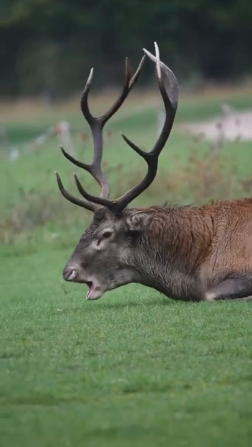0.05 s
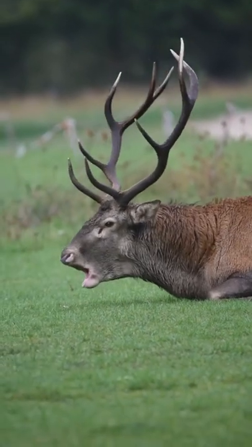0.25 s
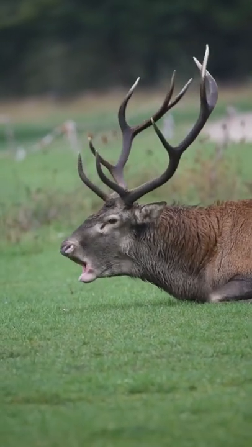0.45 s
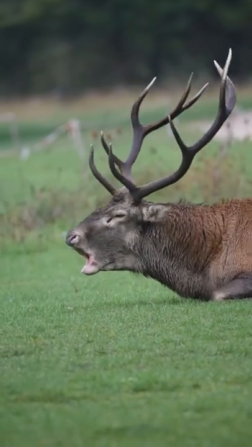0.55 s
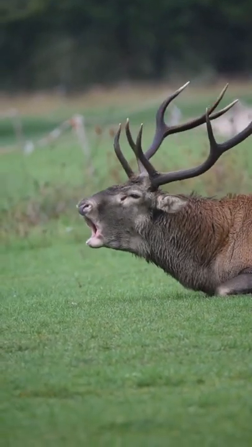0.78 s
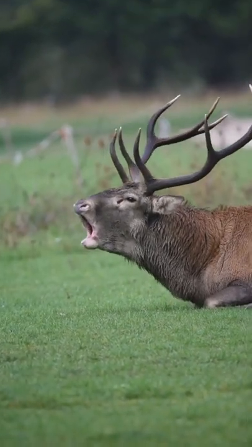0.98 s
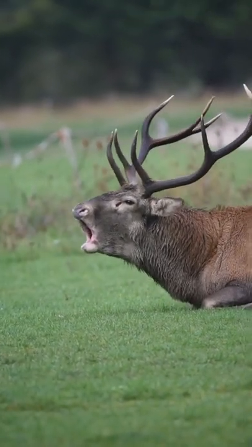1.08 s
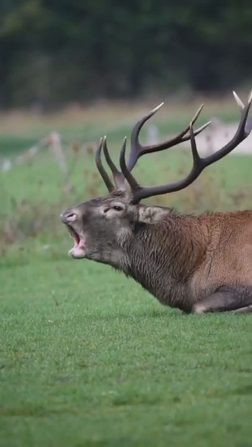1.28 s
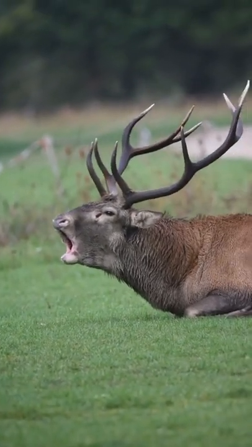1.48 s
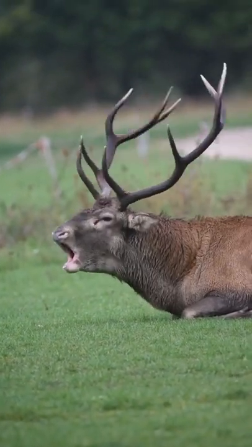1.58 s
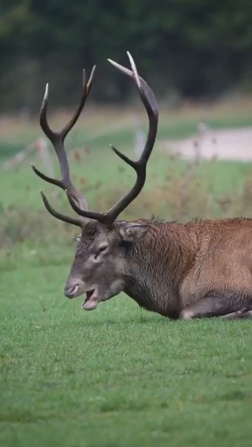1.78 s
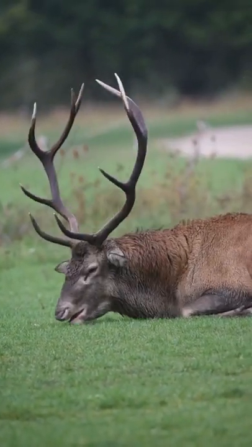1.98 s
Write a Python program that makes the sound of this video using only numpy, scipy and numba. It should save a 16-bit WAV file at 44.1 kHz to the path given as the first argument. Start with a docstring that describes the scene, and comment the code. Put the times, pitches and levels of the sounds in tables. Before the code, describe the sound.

A red deer stag gives one long, harsh roar. It starts softly and roughly, rising in pitch until about 0.3 seconds, then grows louder and sinks to a lower, rasping held tone from 0.8 seconds. Around 1.7 seconds it drops into a creaky grunt and stops by 1.9 seconds. A faint, dull echo fades over the quiet rumble and hiss of the open meadow.

```python
"""One long, harsh roar of a red deer stag carries across a meadow. By the source-filter principle,
pulses of his vocal folds and rasping air excite the resonances of his throat, which sink as he
stretches his neck. The roar ends in a slow, creaky grunt as the mouth closes.
A faint echo returns from the forest edge over a quiet outdoor background."""
import sys
import numpy as np
from scipy import signal
from scipy.fft import rfft, irfft
from scipy.io import wavfile
from scipy.ndimage import uniform_filter1d, map_coordinates
from numba import njit

SR = 44100
rng = np.random.default_rng(int(sys.argv[2]) if len(sys.argv) > 2 else 0)


def unload_audio(sound):
    """Save the sound as a 16-bit wav file, at the path given as the first command line argument."""
    columns = np.transpose(np.atleast_2d(sound))
    # keep every value between -1 and 1, then stretch to whole-number steps
    steps = np.round(np.clip(columns, -1, 1) * 32767)
    wavfile.write(sys.argv[1], SR, steps.astype(np.int16))


N = 90404
TIME_S, BIN_HZ = np.arange(N) / SR, np.arange(N // 2 + 1) * SR / N
LEFT_RIGHT = np.array([[1], [-1]])

# Vibration of the vocal folds. Each row: time in seconds, pulse rate in Hz.
PITCH = [(.06, 117.7), (.1, 123.1), (.13, 137.7), (.2, 150.9), (.262, 152.1), (.39, 147.2), (.526, 141.3),
         (.606, 136.1), (.676, 126.4), (.724, 118.2), (.776, 114.2), (.82, 112.3), (.996, 111.2),
         (1.046, 110.6), (1.146, 108.5), (1.3, 110), (1.432, 112.7), (1.538, 119.9), (1.58, 121),
         (1.644, 119.2), (1.69, 113.3), (1.712, 91.36), (1.75, 73.67)]
# Irregularity and breathiness of the voice. Each row: time in seconds, roughness from 0 to 1.
ROUGHNESS = [(.05, 1), (.14, 0.18), (.24, 0.06), (.56, 0.06), (.68, 0.24), (.8, 0.17), (1.1, 0.05),
             (1.4, 0.07), (1.62, 0.06), (1.7, 0.43), (1.78, 1)]

# Formants, the throat's resonances, in six groups from low to high.
# Each row: time in seconds, then the centre of each formant of the group in Hz.
LOW_HZ = [(0.1, 288, 507, 898, 960), (0.19, 310, 570, 786, 884), (0.28, 373, 503, 796, 934),
          (0.45, 365.7, 485, 750, 840), (0.599, 386, 449, 761, 870), (0.679, 285, 504.8, 632, 850),
          (0.8, 222, 480, 590.5, 847), (1.0, 265.6, 444, 554, 890), (1.13, 260, 416, 529, 840),
          (1.35, 275, 430, 554, 820), (1.44, 258, 544, 543, 850), (1.56, 294, 420, 518, 710),
          (1.68, 267, 504, 578.4, 890)]
MID_HZ = [(0.1, 955, 1385, 1270), (0.19, 938, 1306, 1360), (0.28, 886, 1215, 1300), (0.45, 830, 1146, 1174),
          (0.6, 850, 1125, 1204), (0.68, 660.3, 1063, 1420), (0.8, 626, 1040, 1340), (1.0, 645, 1017, 1324),
          (1.128, 640, 1050, 1314), (1.351, 746, 1033, 1260), (1.441, 890, 1019, 1274),
          (1.58, 945, 1060, 1260), (1.68, 920, 1050, 1280)]
NASAL_HZ = [(.1, 1810, 2030), (.25, 1734, 1970), (.36, 1710, 2140), (.5, 1712, 1920), (.62, 1690, 1875),
            (.72, 1610, 1890), (.85, 1740, 1974), (1.0, 1803, 1955), (1.2, 1731, 1850), (1.352, 1780, 1890),
            (1.44, 1660, 1800), (1.58, 1816, 1880), (1.7, 1830, 1850)]
UPPER_HZ = [(.12, 2180, 2260, 2900, 3360), (.26, 2210, 2680, 2950, 3300), (.4, 2530, 2540, 2820, 3370),
            (.6, 2140, 2533, 2900, 3200), (.7, 2220, 2646, 3000, 3320), (.85, 2340, 2607, 2920, 3400),
            (1.02, 2460, 2734, 3010, 3130), (1.13, 2222, 2600, 3133, 3623), (1.33, 2205, 2597, 3090, 3370),
            (1.44, 2212, 2552, 3060, 3210), (1.58, 2215, 2508, 2700, 3150), (1.7, 2150, 2590, 3120, 3280)]
TREBLE_HZ = [(.26, 4100, 4940, 5550), (.4, 3490, 4570, 5480), (.55, 3380, 4660, 5430),
             (.7, 3540, 4150, 5400), (.85, 4150, 5260, 5540), (1.02, 3900, 5040, 5530),
             (1.2, 3560, 4480, 5530), (1.33, 3670, 4570, 5400), (1.45, 3500, 4200, 5500),
             (1.6, 3570, 4200, 5582), (1.718, 3500, 5160, 5450)]
SIZZLE_HZ = [(.3, 6240, 6870, 7300), (.6, 5900, 7340, 8200), (.9, 5900, 7600, 7950),
             (1.2, 6060, 7400, 8138), (1.451, 6060, 7750, 8140), (1.7, 6240, 7830, 8100)]
# How each of those formants rings. Each row: bandwidth in Hz, relative gain in dB, polarity.
LOW_MODES = [(124, -5.5, 1), (65.4, -3, -1), (23.9, 10.5, -1), (48.3, -8, 1)]
MID_MODES = [(73.6, 7.5, 1), (42.7, 9.5, -1), (71.3, 1, 1)]
NASAL_MODES = [(82.6, -0.077, 1), (80, -0.92, -1)]
UPPER_MODES = [(129, -3, 1), (88, 4, -1), (129, -6, 1), (158, -6.5, -1)]
TREBLE_MODES = [(320, 3, 1), (420, 1, -1), (298, 2.5, 1)]
SIZZLE_MODES = [(450, 0.31, 1), (500, 0, -1), (525, 0.5, 1)]
# Envelopes of the groups, ahead of the notch and final fade. Each row: time in seconds, level in dB.
LOW_LEVEL = [(0.042, -62), (0.076, -41.5), (0.104, -40.5), (.148, -46), (0.255, -32.5), (.328, -26),
             (0.414, -21.5), (0.636, -21.5), (0.691, -29.5), (.834, -28.5), (0.995, -21), (1.12, -18),
             (1.231, -20.5), (1.37, -19), (1.416, -31.5), (1.451, -24.5), (1.484, -29), (1.664, -28.5),
             (1.696, -20.5), (1.744, -27), (1.774, -38), (1.809, -79), (1.86, -91)]
MID_LEVEL = [(0.049, -66), (0.149, -37.5), (.252, -39), (0.327, -30), (.585, -28.5), (0.639, -47.5),
             (0.679, -33), (.834, -35.5), (0.988, -30.5), (1.054, -48), (1.125, -35.5), (1.351, -41.5),
             (1.411, -30), (1.484, -31.5), (1.55, -39), (1.71, -33), (1.749, -39.5), (1.791, -53),
             (1.86, -97)]
NASAL_LEVEL = [(0.05, -84), (0.07, -59), (0.13, -43.5), (0.21, -40.5), (0.452, -45), (0.568, -41.5),
               (0.634, -45), (0.67, -39.5), (0.88, -41.5), (0.962, -38), (1.092, -44), (1.35, -43),
               (1.374, -53), (1.436, -49), (1.512, -44.5), (1.712, -42.5), (1.808, -60.5), (1.86, -58)]
UPPER_LEVEL = [(0.05, -80), (0.12, -54.5), (0.312, -45.5), (0.644, -41), (0.68, -38), (0.776, -43),
               (0.8, -38.5), (1.012, -35.5), (1.062, -40.5), (1.112, -33.5), (1.31, -34), (1.37, -40.5),
               (1.622, -33.5), (1.642, -39.5), (1.698, -36), (1.758, -41), (1.784, -56), (1.86, -64)]
TREBLE_LEVEL = [(.12, -74), (.33, -56), (.46, -53), (.62, -58.5), (.676, -51), (.71, -55.5), (.8, -51.5),
                (1.04, -43), (1.068, -53.5), (1.118, -43), (1.162, -45.5), (1.33, -46), (1.472, -53.5),
                (1.66, -51.5), (1.7, -43), (1.725, -52), (1.746, -44), (1.79, -57), (1.86, -75)]
SIZZLE_LEVEL = [(0.2, -70), (0.286, -64.5), (0.634, -58), (0.856, -44), (1.24, -50.5), (1.262, -47),
                (1.55, -51.5), (1.678, -45.5), (1.716, -51.5), (1.744, -43), (1.818, -65), (1.86, -72)]
# Deepest resonance, strongest with the mouth nearly shut. Each row: time in seconds, level in dB.
GRUNT_LEVEL = [(.04, -61), (.075, -53), (.14, -87), (0.298, -46), (1.66, -48), (1.7, -36), (1.735, -27),
               (1.76, -36.5), (1.802, -47.5), (1.88, -80)]
# Damping of the low formants. Each row: time in seconds, multiple of their bandwidth.
LOW_DAMPING = [(.1, 1.2), (.3, 1), (1.4, 1), (1.55, 1.2), (1.68, 1.2), (1.74, 2.2)]
# Antiresonance that hollows the held vowel. Each row: time in seconds, depth from 0 to 1.
NOTCH_DEPTH = [(.74, 0.026), (.85, 0.82), (1.38, 0.82), (1.5, 0.2)]

# Envelope of the air rushing through the mouth. Each row: time in seconds, level in dB.
HISS_LEVEL = [(.2, -77), (.36, -61.5), (.55, -65), (.66, -60), (.76, -59), (1.0, -63.5), (1.6, -68.5),
              (1.74, -60), (1.8, -67)]
# Colour of that air. Each row: frequency in Hz, relative spectral density in dB.
HISS_SPECTRUM = [(7000, -28), (9000, -4), (11000, -4.5), (13200, -11.5), (14500, -23.5)]
# Near reflections from the ground and the animal's body. Each row: delay in seconds, gain in dB.
REFLECTIONS = [(.0019, -10), (.0038, -8.5)]
# Stereo balance of the direct sound. Each row: frequency in Hz, left minus right level in dB.
BALANCE = [(300, 0), (550, .7), (1200, .4), (2400, -2.3), (4400, -1), (8000, -2.2), (13000, -.8)]
# Colour of the outdoor background. Each row: frequency in Hz, relative spectral density in dB.
BACKGROUND_SPECTRUM = [(25, -13), (60, 0), (130, 0), (250, -6.5), (500, -10), (1000, -11.5), (2500, -20),
                       (4000, -29.5), (9000, -30), (13000, -40.5), (15500, -59)]

PUFF_CYCLES, LEAK = 0.26, 0.58  # decay of each puff of air, and the steady flow beneath it


def stag():
    """Source and filter: pulses drive the low formants; buzz and rasp take over towards the treble."""
    pulses, air, stereo_air = vocal_folds()
    buzz = fold_buzz()
    smooth_source = pulses + undb(-12.5) * air
    mouth_closing = 1 - 0.43 * curve([(1.698, 0), (1.725, 1)])  # lowers the low formants
    low = throat(smooth_source, LOW_HZ, LOW_MODES, LOW_LEVEL, band_hz=(110, 756),
                 shift=mouth_closing, damping=curve(LOW_DAMPING))
    grunt = throat(smooth_source, centres=[(0, 181.7)], modes=[(20, 0, 1)], levels=GRUNT_LEVEL,
                   band_hz=(85, 250))
    mid = throat(-pulses + undb(2.5) * air, MID_HZ, MID_MODES, MID_LEVEL, band_hz=(781, 1438))
    vowel = low + mid
    vowel -= curve(NOTCH_DEPTH) * resonate(vowel, hz=np.full(N, 658.), width_hz=np.full(N, 63.))

    breathy_source = pulses + undb(5) * air
    nasal_source = near_reflections(breathy_source + undb(-5) * buzz)
    nasal = throat(nasal_source, NASAL_HZ, NASAL_MODES, NASAL_LEVEL, band_hz=(1400, 2200))
    upper_source = near_reflections(breathy_source + undb(-7) * buzz)
    upper = throat(upper_source, UPPER_HZ, UPPER_MODES, UPPER_LEVEL, band_hz=(2050, 3800))

    treble = np.zeros((2, N))
    for channel, own_air in enumerate(stereo_air):
        rasp = near_reflections(pulses + undb(4) * buzz + undb(15) * (air + own_air))
        treble[channel] = throat(rasp, TREBLE_HZ, TREBLE_MODES, TREBLE_LEVEL, band_hz=(3000, 6200))
        treble[channel] += throat(rasp, SIZZLE_HZ, SIZZLE_MODES, SIZZLE_LEVEL, band_hz=(5500, 9600))
    fade = curve([(1.79, 1), (1.854, 0)])
    return (vowel + grunt + nasal + upper + treble + mouth_hiss()) * fade


def vocal_folds(jitter_s=0.00005, shimmer_db=5):
    """Glottal source: each closure makes a pulse and a puff; roughness scales scatter and turbulence."""
    roughness, cycles = curve(ROUGHNESS), fold_cycles()
    turbulence = rng.standard_normal((3, N))
    closures_s = np.interp(np.arange(1, int(cycles[-1])), cycles, TIME_S)
    scatter = rng.standard_normal((len(closures_s), 2)).T * np.interp(closures_s, TIME_S, roughness)
    position = (closures_s + jitter_s * scatter[0])[:, None] * SR
    strength = undb(shimmer_db * scatter[1])[:, None]
    taps = position.astype(int) + np.arange(-7, 9)
    impulse = np.sinc(taps - position) * np.sinc((taps - position) / 8)  # band-limited
    pulses = np.zeros(N)
    np.add.at(pulses, np.clip(taps, 0, N - 1), -impulse * strength)
    airflow = LEAK + puff(cycles) + 0.3 * puff(cycles - 0.3)  # a weaker puff as the folds part
    shared_air = roughness * unit_rms(airflow * turbulence[0])
    stereo_air = roughness * unit_rms(airflow * turbulence[1:])
    return unit_rms(pulses), shared_air, stereo_air


def fold_cycles():
    """Phase is the integral of frequency: the running count of the folds' cycles."""
    return np.cumsum(curve(PITCH)) / SR


def puff(cycles):
    """Airflow jumps once a cycle and relaxes exponentially."""
    return np.exp(-(cycles % 1) / PUFF_CYCLES)


def fold_buzz(memory_cycles=18, decay_s=0.011):
    """Quasi-periodicity: the wet folds slap after each closure in a slowly changing pattern, a buzz."""
    cycles = fold_cycles()
    since_closure_s = (cycles % 1) / curve(PITCH)
    noise = rng.standard_normal((400, 800))  # one row per cycle
    patterns = signal.lfilter([1], [1, -np.exp(-1 / memory_cycles)], noise, axis=0)
    slaps = map_coordinates(patterns, [np.floor(cycles), since_closure_s * SR], order=3, mode="nearest")
    return unit_rms(slaps * np.exp(-since_closure_s / decay_s))


def throat(source, centres, modes, levels, band_hz, shift=1, damping=1):
    """Superposition: moving formants ring in parallel; their band-limited sum follows an envelope."""
    centres = np.array(centres, float)
    ring = np.zeros(N)
    for column, (width_hz, db, polarity) in enumerate(modes, start=1):
        hz = shift * curve(centres[:, [0, column]])
        ring += polarity * undb(db) * resonate(source, hz, np.full(N, width_hz) * damping)
    ring = signal.sosfiltfilt(signal.butter(4, band_hz, "band", fs=SR, output="sos"), ring)
    power = uniform_filter1d(uniform_filter1d(ring ** 2, size=800), size=600)
    return ring / np.sqrt(np.abs(power) + 1e-18) * undb(curve(levels))


@njit
def resonate(x, hz, width_hz):
    """A driven, damped oscillator: a state-variable band-pass with unit gain at its moving centre."""
    y, band_state, low_state = np.empty(len(x)), 0., 0.
    for i in range(len(x)):
        tuning, loss = np.tan(np.pi * hz[i] / SR), width_hz[i] / hz[i]
        band = (band_state + tuning * (x[i] - low_state)) / (1 + tuning * (tuning + loss))
        band_state = 2 * band - band_state
        low_state += 2 * tuning * band
        y[i] = loss * band
    return y


def mouth_hiss():
    """Amplitude modulation: turbulence in the open mouth swells once per cycle of the folds."""
    airflow = LEAK + puff(fold_cycles())
    rush = irfft(diffuse_spectrum() * undb(by_frequency(HISS_SPECTRUM)), N)
    return unit_rms(airflow * rush) * undb(curve(HISS_LEVEL))


def near_reflections(x, lag_s=0.001002):
    """Multipath interference: delayed copies blur the sharp part of a closure, behind the low pulse."""
    paths = [(0.0018, 0)] + REFLECTIONS
    return sum(undb(db) * np.interp(TIME_S - lag_s - delay_s, TIME_S, x) for delay_s, db in paths)


def forest_echo(voice, cutoff_hz=2400, split_hz=900, low_t60_s=0.77, high_t60_s=1, build_s=0.0097):
    """Scattering by the trees returns a dull, diffuse echo that decays exponentially in two bands."""
    dull_noise = diffuse_spectrum() / np.hypot(1, BIN_HZ / cutoff_hz)
    low_share = 1 / (1 + (BIN_HZ / split_hz) ** 4)
    low = irfft(dull_noise * low_share, N) * undb(-60 * TIME_S / low_t60_s)
    high = irfft(dull_noise * (1 - low_share), N) * undb(-60 * TIME_S / high_t60_s)
    tail = (low + high) * np.minimum(TIME_S / build_s, 1) ** 2
    tail *= np.sqrt(np.pi * cutoff_hz / SR / np.sum(tail[0] ** 2))  # pass-band gain of roughly 1
    return undb(-11) * signal.fftconvolve(voice, tail, axes=1)[:, :N]


def open_air():
    """Stationary noise, shaped in frequency, gives the low rumble and faint hiss of the outdoors."""
    noise = irfft(diffuse_spectrum() * undb(by_frequency(BACKGROUND_SPECTRUM)), N)
    return undb(-48) * unit_rms(noise)


def diffuse_spectrum(wide_hz=1100):
    """Stereo noise spectrum of a diffuse field, in which long waves reach both sides alike."""
    mid, side = rfft(rng.standard_normal((2, N)))
    width = np.minimum(BIN_HZ / wide_hz, 1) ** 2
    return mid + width * side * LEFT_RIGHT


def undb(db):
    """Amplitude ratio of a level in decibels."""
    return 10 ** (np.asarray(db) / 20)


def curve(rows):
    """Linear interpolation in time through rows of seconds and value."""
    return np.interp(TIME_S, *np.array(rows, float).T)


def by_frequency(rows):
    """Interpolation in log frequency through rows of Hz and value, one result per bin."""
    hz, value = np.array(rows, float).T
    return np.interp(np.log(BIN_HZ + 1), np.log(hz), value)


def unit_rms(x):
    """Normalisation to a mean power of one."""
    return x / np.sqrt(np.mean(x ** 2))


def scene(left_lag_s=0.000025):
    """Level and arrival-time cues place the stag; his direct sound, echo and the open air add up."""
    voice = stag()
    balance = undb(LEFT_RIGHT / 2 * by_frequency(BALANCE))
    delay = np.exp(-2j * np.pi * BIN_HZ * left_lag_s * LEFT_RIGHT / 2)
    direct = irfft(rfft(voice) * balance * delay, N)
    return direct + forest_echo(voice) + open_air()


def record(dry, mono_below_hz=480, top_hz=15000):
    """Mid-side filtering keeps the bass in the centre; a steep low-pass cuts the top."""
    high_pass = signal.butter(3, mono_below_hz, "high", fs=SR, output="sos")
    side = signal.sosfiltfilt(high_pass, (dry[0] - dry[1]) / 2)
    stereo = dry.mean(axis=0) + side * LEFT_RIGHT
    return signal.sosfilt(signal.ellip(8, .2, 70, top_hz, fs=SR, output="sos"), stereo)


dry = scene()
out = record(dry)
unload_audio(out)
```